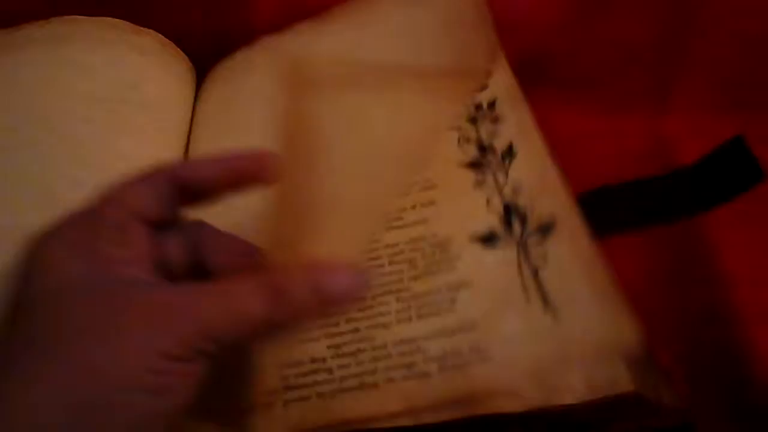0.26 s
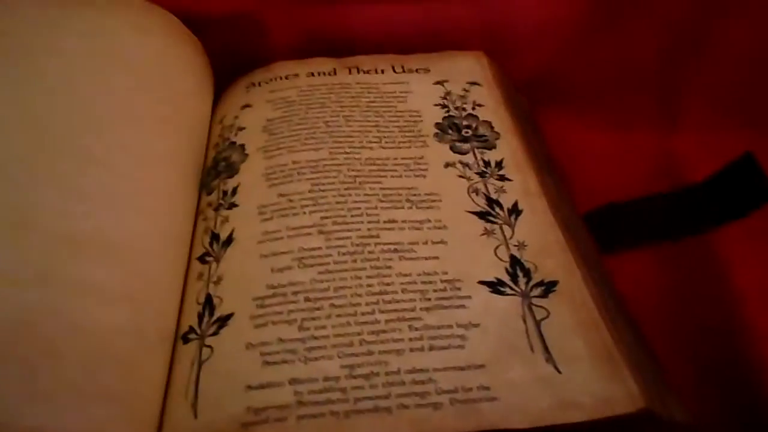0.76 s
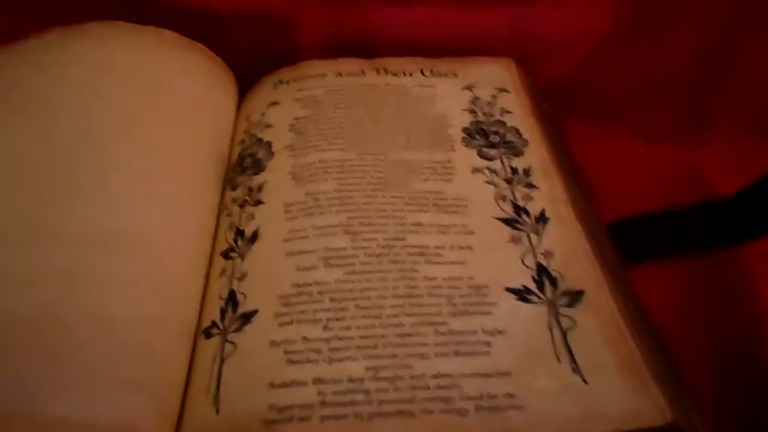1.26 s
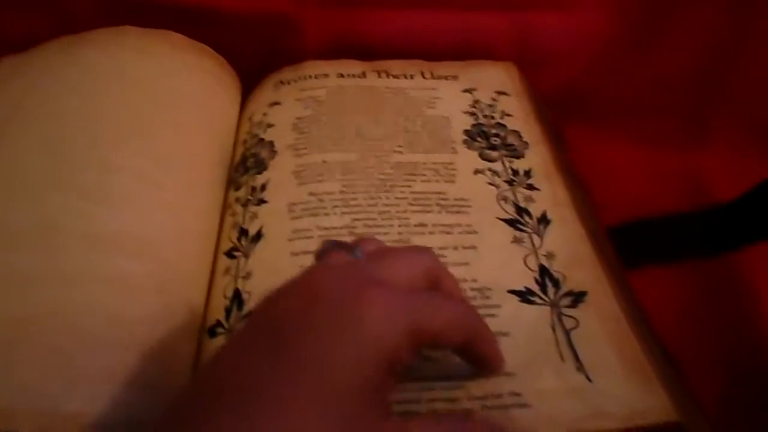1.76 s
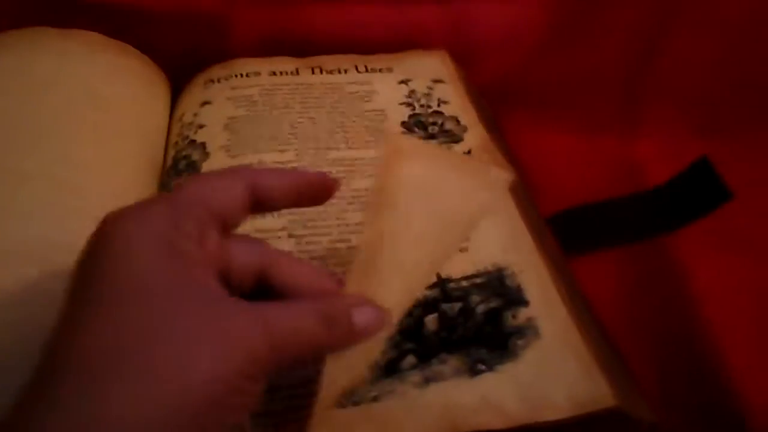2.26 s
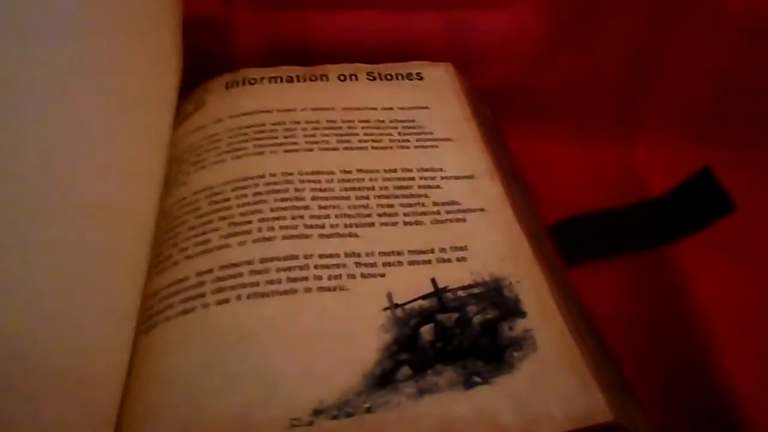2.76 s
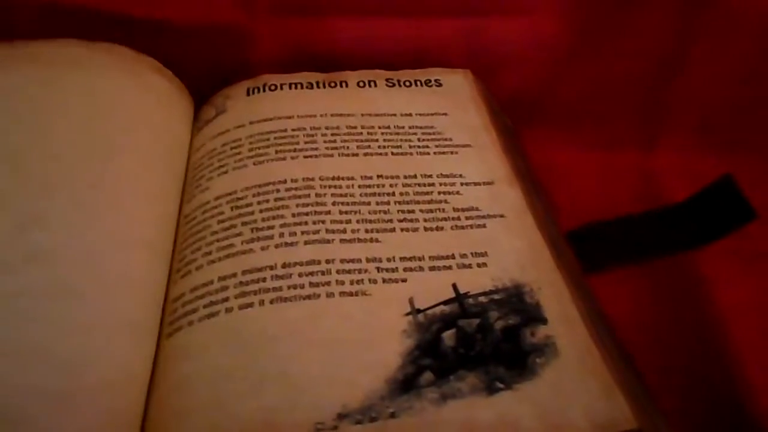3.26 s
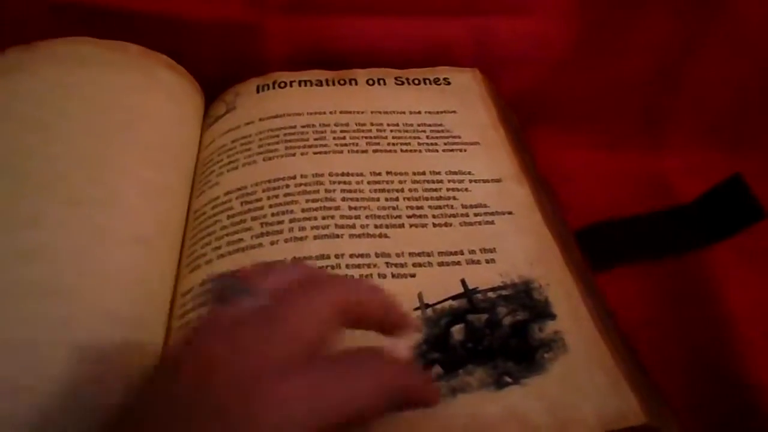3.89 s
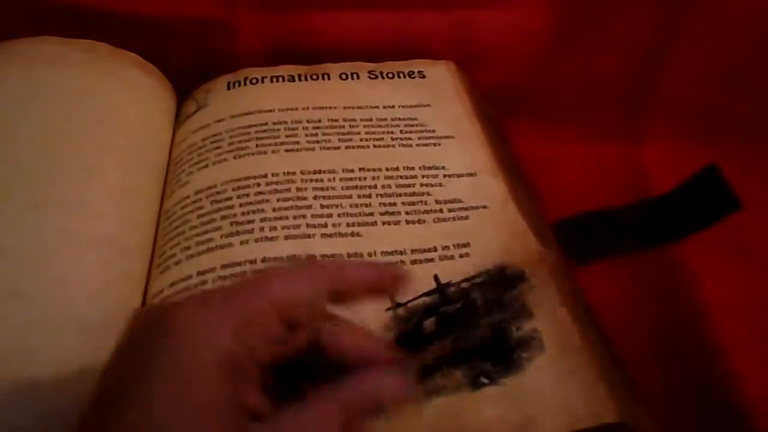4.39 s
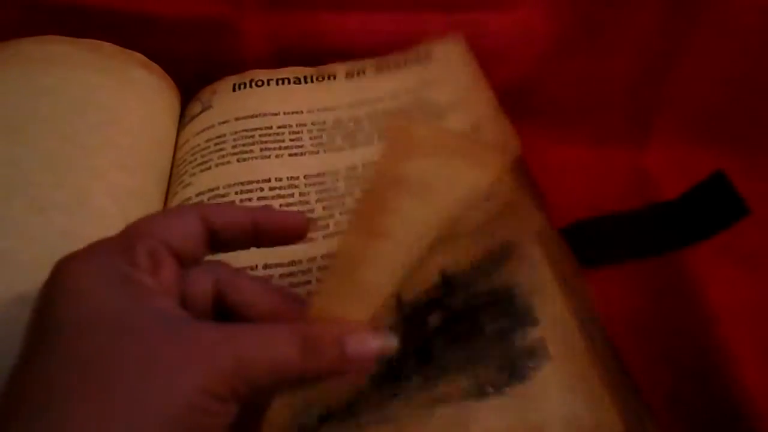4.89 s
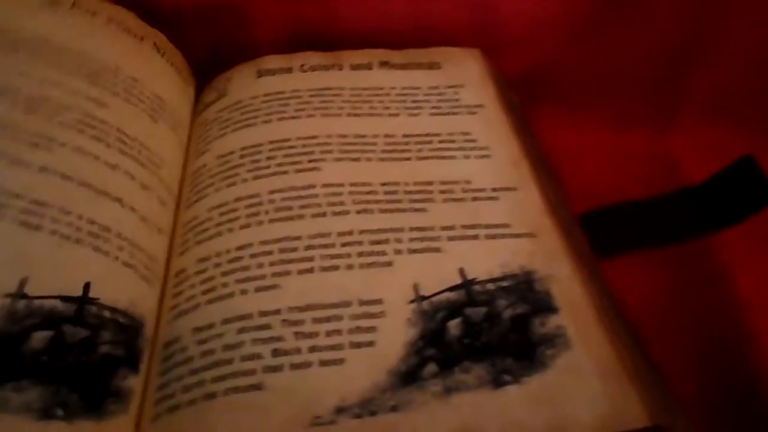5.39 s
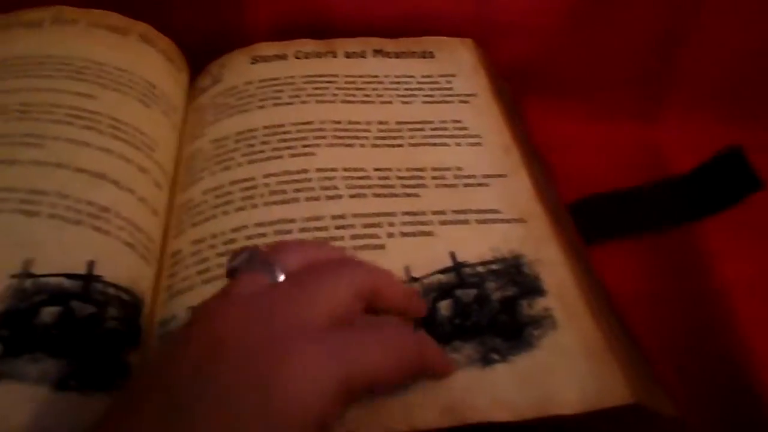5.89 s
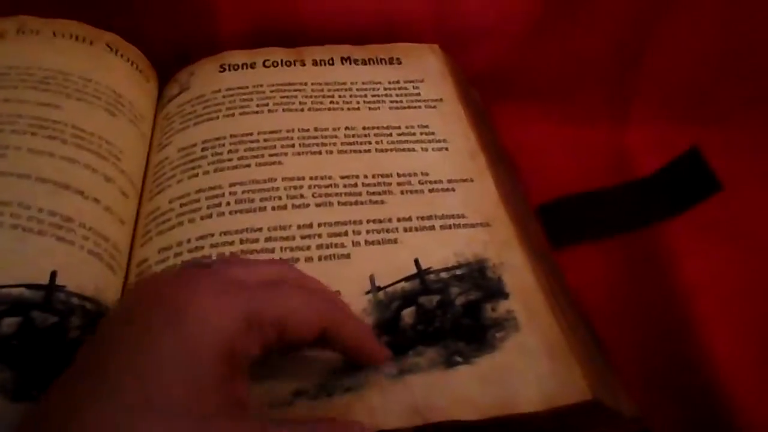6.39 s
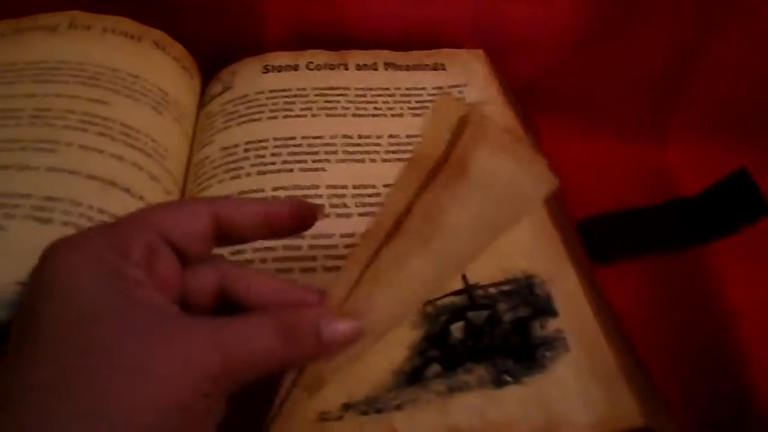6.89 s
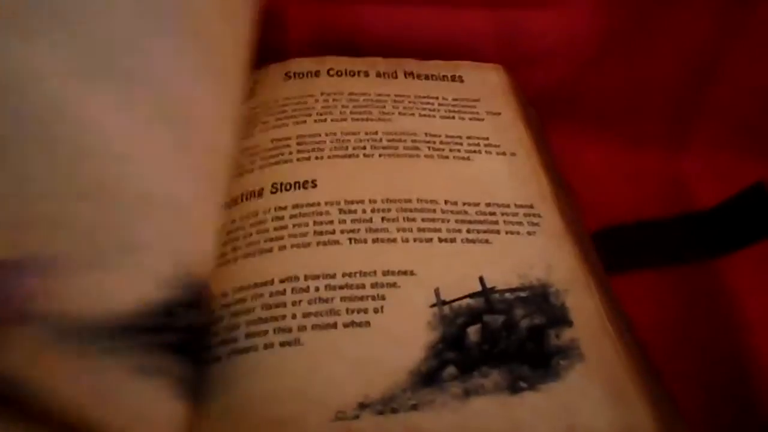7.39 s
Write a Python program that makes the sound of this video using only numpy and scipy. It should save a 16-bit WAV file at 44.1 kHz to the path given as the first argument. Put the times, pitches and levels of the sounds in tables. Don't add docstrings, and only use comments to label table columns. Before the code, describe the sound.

A hand turns stiff pages of a thick book close to a small microphone in a quiet room. A quick rustling turn with pops comes first, then two very loud hard clicks, then three more turns with pauses, each a papery hiss with dull pops and snaps. Low rumble and hiss lie behind, with a faint far hum now and then.

```python
import sys
import numpy as np
from scipy import signal
from scipy.fft import rfft, irfft
from scipy.io import wavfile
from scipy.ndimage import uniform_filter1d

SR = 44100
rng = np.random.default_rng(int(sys.argv[2]) if len(sys.argv) > 2 else 0)


def waveform_to_disk(signal):
    frames = np.transpose(np.atleast_2d(signal))
    scaled = np.clip(frames, -1, 1) * 32767
    samples = np.round(scaled).astype(np.int16)
    wavfile.write(sys.argv[1], SR, samples)


def voltage_ratio(decibels):
    exponent = np.asarray(decibels, float) / 20
    return 10 ** exponent


N = 337365

# (frequency [Hz], width [Hz], level [dB])
BOOM_MODES = [(908, 225, 2.5), (1250, 580, 6), (1980, 610, -2)]


def evened(x):
    return x / np.sqrt(np.mean(x ** 2) + 1e-20)


def add(mix, s, sound):
    part = mix[round(s * SR):][:len(sound)]
    part += sound[:len(part)]


def coloured(x, modes):
    hz = np.fft.rfftfreq(len(x), 1 / SR)
    power = sum(voltage_ratio(db) ** 2 / (1 + (2 * (hz - f) / w) ** 2) ** 2 for f, w, db in modes)
    return evened(irfft(rfft(x) * np.sqrt(power), len(x)))


def resonate(x, hz, width_hz):
    turn = np.exp(2j * np.pi * np.cumsum(hz * np.ones(len(x))) / SR)
    r = np.exp(-np.pi * width_hz / SR)
    return 2 * (turn * signal.lfilter([(1 - r) ** 2], [1, -2 * r, r * r], x / turn)).real


def patchy(hz_span, s_span, size):
    across_hz = uniform_filter1d(rng.standard_normal(size), hz_span, axis=0)
    return evened(uniform_filter1d(across_hz, s_span, axis=1))


def hump(length_s, lean):
    return np.sin(np.pi * np.linspace(0, 1, round(length_s * SR)) ** np.clip(lean, .2, 1.5)) ** 2


def top_cut(x, hz):
    return signal.oaconvolve(x, signal.firwin(511, hz, window=("kaiser", 8), fs=SR), "same")


def paper_noise():
    # (frequency [Hz], width [Hz], level [dB])
    rub_modes = [(3240, 3300, 1.5), (4330, 990, -2), (5300, 3900, -2.5)]
    # (frequency [Hz], width [Hz], level [dB])
    fibre_modes = [(8320, 4200, 7), (10100, 2900, 12.5), (13500, 5000, -24)]
    grain_db, patchy_db, flutter_db = 3, 2.4, 1.2
    grains = rng.standard_normal(N) * voltage_ratio(grain_db * np.minimum(rng.exponential(1, N), 4))
    z = signal.stft(grains, nperseg=256, noverlap=192)[2]
    z = z * voltage_ratio(patchy_db * patchy(hz_span=4, s_span=20, size=z.shape))
    wandering = signal.istft(z, nperseg=256, noverlap=192)[1][:N]
    flutter = voltage_ratio(flutter_db * evened(uniform_filter1d(rng.standard_normal(N), size=300)))
    return [coloured(wandering * flutter, modes) for modes in (BOOM_MODES, rub_modes, fibre_modes)]


def crackle():
    creases_per_s = 250
    creases = (rng.random(N) < creases_per_s / SR) * voltage_ratio(4.1 * np.minimum(rng.exponential(1, N), 2.5))
    creases = creases * rng.choice([-1., 1.], N)
    t = np.arange(600) / SR
    ring = sum(voltage_ratio(db - 13.0 * w * t) * np.sin(2 * np.pi * hz * t) for hz, w, db in BOOM_MODES)
    return evened(signal.oaconvolve(creases, ring)[:N])


def bumps(rows, lean, main, side):
    out = np.zeros(N)
    for s, length_s, db, side_db in rows:
        shape = hump(length_s, lean)
        at = max(round(s * SR) - shape.argmax(), 0)
        part = (main + voltage_ratio(side_db) * side)[at:at + len(shape)]
        add(out, at / SR, voltage_ratio(db) * shape[:len(part)] * part)
    return out


def slides(boom, rub, fibre):
    # (time [s], sliding speed [dB], hand weight on the block [dB])
    page_turns = [
        [(0.0, -58.5, -63), (0.124, -60.5, -59), (0.272, -44.5, -59), (0.452, -48.5, -90), (0.534, -60.5, -63),
         (0.79, -54.5, -48), (1.184, -63.5, -59.5), (1.2, -67, -49), (1.5, -61.5, -60.5)],
        [(1.95, -69, -80), (2.198, -54.5, -61), (2.33, -66, -78), (2.6, -69, -58), (2.738, -64, -57),
         (2.944, -68, -55.5), (3.2, -57, -57.5), (3.51, -75, -68), (3.85, -63, -55)],
        [(4.4, -67, -68), (4.6, -77, -84), (4.724, -56, -57), (4.862, -61, -57.5), (4.946, -45, -51.5),
         (5.26, -63, -90), (5.348, -67, -54), (5.698, -51.5, -55), (5.9, -69, -69)],
        [(6.2, -72, -63), (6.478, -68, -64), (6.65, -70.5, -69), (7.014, -64.5, -64), (7.258, -60, -63),
         (7.378, -49, -61), (7.536, -67, -49), (7.56, -65, -63), (7.65, -63, -42.5)],
    ]
    # (frequency [Hz], width [Hz], level [dB])
    thud_modes = [(145.4, 40, 6), (241, 390, 0), (427, 69, 1.5)]
    # (top time [s], length [s], thud [dB], sheet boom [dB])
    loads = [(0.01, 0.09, -69, -17), (1.42, 0.075, -48, -5.5), (0.665, 0.18, -47, 1),
             (1.21, 0.11, -46, -10), (2.664, 0.08, -53, -7), (2.86, 0.095, -50, -17),
             (2.94, 0.17, -47, -10), (3.55, 0.092, -43, -7), (3.67, 0.21, -49, -6), (3.595, .06, -52, 1),
             (5.16, 0.098, -51.5, -17), (5.36, 0.17, -51, -6), (5.505, 0.064, -46.5, -19),
             (5.608, 0.056, -45, -12), (6.5, .4, -61, -9), (6.92, 0.27, -57.5, -23), (7.08, 0.1, -60, -12),
             (7.31, 0.051, -56, -11), (7.64, 0.041, -56, 3)]
    # (top time [s], length [s], fibre hiss [dB], rub [dB])
    brushes = [(0.272, 0.083, -46, -1.5), (0.39, 0.12, -54, -21), (0.63, 0.068, -64, 0),
               (2.05, .07, -59, -6), (3.07, 0.11, -55, -15), (3.66, 0.067, -71, -4),
               (4.65, 0.019, -67, -10), (4.775, 0.026, -57.5, 0), (5.03, 0.27, -54.5, -19),
               (5.156, .1, -50, -18), (5.606, 0.15, -45, -10), (6.6, 0.07, -62, -26), (7.33, .05, -53, -25)]
    lumpy_db, crackle_db, fibre_db, thud_db = 2, -2.5, 0, -0.5
    t, speed, weight = np.arange(N) / SR, np.zeros(N), np.zeros(N)
    lumps = voltage_ratio(lumpy_db * evened(uniform_filter1d(rng.standard_normal(N), size=250)))
    thud = evened(lumps * coloured(rng.standard_normal(N), thud_modes))
    boom = evened(boom + voltage_ratio(crackle_db) * crackle())
    for rows in page_turns:
        s, speed_db, weight_db = np.transpose(rows)
        inside = np.clip(np.minimum(t - s[0] + .02, s[-1] + .02 - t) / .02, 0, 1)
        speed += inside * voltage_ratio(np.interp(t, s, speed_db) - 5)
        weight += inside * voltage_ratio(np.interp(t, s, weight_db) - 3.5)
    steady = speed * (rub + voltage_ratio(fibre_db) * fibre) + weight * (boom + voltage_ratio(thud_db) * thud)
    return steady + bumps(loads, 0.41, thud, boom) + bumps(brushes, 0.74, fibre, rub)


def drag(rows, rise_s, boom_db, boom, rub, fibre):
    t, out = np.arange(N) / SR, np.zeros(N)
    for start, end, db, bright_db, change_db in rows:
        now = slice(round(start * SR), round((end + .08) * SR))
        u = t[now]
        shape = (1 - np.exp(-abs(u - start) / rise_s)) ** 2 * voltage_ratio(-60 * np.maximum(u - end, 0) / 0.042)
        level = voltage_ratio(db + change_db * np.minimum((u - start) / (end - start), 1))
        friction = np.roll(rub + voltage_ratio(bright_db) * fibre + voltage_ratio(boom_db) * boom, N // 3)[now]
        out[now] += shape * level * friction
    return out


def strokes(paper):
    # (start [s], end [s], friction [dB], brightness [dB], change by the end [dB])
    stroke_rows = [ (0.116, 0.173, -54, 8, -7), (0.548, 0.632, -49, -1.5, -1.5),
                   (0.759, 0.954, -52.5, 5.5, -5.5), (1.038, 1.078, -47, -4, -7),
                   (1.278, 1.324, -49.5, -5.5, -3.5), (2.111, 2.155, -55.5, 3, -11),
                   (2.315, 2.328, -52.5, 8.5, -2), (2.353, 2.373, -46.5, 8, -8.5),
                   (2.758, 2.828, -54.5, -16, 0), (2.855, 2.87, -57, -3, 0), (2.87, 2.908, -52, -3, -2.5),
                   (2.924, 3.111, -53.5, -4, -6.5), (3.361, 3.38, -57.5, -5, -1),
                   (3.655, 3.772, -53, -1.5, 3.5), (4.901, 5.245, -53.5, -1, 1),
                   (5.269, 5.344, -42.5, -3.5, -14), (5.495, 5.658, -55.5, 5, 6),
                   (7.166, 7.254, -40.5, 1, -17), (7.288, 7.326, -44, 3, -9), (7.337, 7.4, -54.5, 11, -17),
                   (7.631, 7.66, -49.5, -0.5, 8), ]
    return drag(stroke_rows, 0.0015, -7, *paper)


def glides(paper):
    # (start [s], end [s], friction [dB], brightness [dB], change by the end [dB])
    glide_rows = [ (0.2, 0.52, -45.5, -1.5, -13), (1.325, 1.41, -47, 3.5, -7), (2.0, 2.07, -52.5, 0, -6),
                  (2.17, 2.265, -62, 6, 5), (3.16, 3.24, -63.5, 7, -5), (4.862, 4.905, -44, 1, 1),
                  (5.42, 5.475, -54.5, 2, -5), (6.76, 6.84, -62, 8, -5), (6.92, 6.965, -59, 6.5, -7),
                  (7.045, 7.112, -42, 0.5, -6.5), (7.425, 7.54, -45, -2, -11), (1.58, 1.628, -65.5, -2, 5),
                  (1.79, 1.89, -64.5, 7, -12), (4.5, 4.63, -67, 10.5, 3.5), ]
    return drag(glide_rows, 0.0094, -6.5, *paper)


def slips(boom, rub, fibre):
    # (time [s], puff peak [dB], brightness [dB], boom [dB], t60 [s])
    jumps = [(0.039, -34, -5, -0.5, 0.022), (1.192, -36, 3, -4, 0.03), (1.248, -33, -4, -5, 0.03),
             (2.4758, -33.5, 7.5, -1.5, 0.044), (2.5646, -33, 7.5, -1, 0.042),
             (2.6614, -31.5, 3, -6, 0.067), (2.698, -36.5, 2.5, -8, 0.049), (3.411, -42.5, 2, 1, 0.062),
             (3.5381, -37, -0.5, 0, 0.08), (3.657, -39, 3, -1, 0.08), (5.102, -23.5, 4, -7, 0.035),
             (5.6469, -27, -17, -3, 0.044), (7.1682, -32, 5, -19, 0.088)]
    t, out = np.arange(6000) / SR, np.zeros(N)
    for s, db, bright_db, boom_db, t60_s in jumps:
        at = round(s * SR)
        puff = (rub + voltage_ratio(bright_db) * fibre + voltage_ratio(boom_db) * boom)[at // 2:][:len(t)]
        fall = voltage_ratio(-60 * t / max(t60_s, .01)) + voltage_ratio(-13 - 60 * t / .2)
        shape = (1 - np.exp(-t / 0.001)) * voltage_ratio(db - 10.0) * fall
        add(out, s, shape[:len(puff)] * puff)
    return out


def swells():
    # (top time [s], length [s], frequency [Hz], level [dB])
    swell_rows = [ (0.263, 0.12, 5500, -47), (0.29, 0.15, 1760, -46), (0.68, 0.045, 1110, -34.5),
                  (0.675, .025, 2150, -42.5), (0.775, 0.031, 1150, -43), (1.326, .016, 1280, -37),
                  (7.612, 0.025, 970, -46.5), (3.698, 0.02, 1260, -33.5), (3.76, 0.024, 1300, -40.5),
                  (4.889, 0.051, 2260, -45), (4.99, 0.12, 1640, -44), (4.981, 0.11, 4250, -45.5),
                  (5.325, 0.05, 1150, -44), (5.439, 0.028, 1130, -41.5), (5.52, 0.024, 1120, -41),
                  (5.695, 0.036, 1070, -42.5), (7.084, .06, 2000, -49.5), (5.144, 0.24, 4100, -57),
                  (7.462, 0.023, 1150, -41), (7.634, 0.033, 1100, -38), (5.611, 0.013, 1150, -37),
                  (0.66, .06, 960, -50.5), (0.46, 0.079, 4700, -53), ]
    out, size = np.zeros(N), (len(swell_rows), SR // 4)
    rubbing = rng.standard_normal(size) * voltage_ratio(3.5 * np.minimum(rng.exponential(1, size), 5))
    for (s, length_s, hz, db), noise in zip(swell_rows, rubbing):
        shape = hump(length_s, .75)
        band = resonate(noise, hz, 523 + 0.17 * hz)[:len(shape)]
        add(out, s - shape.argmax() / SR, voltage_ratio(db - 2.5) * evened(band * shape))
    return out


def bands():
    # (start [s], end [s], first frequency [Hz], last frequency [Hz], level [dB])
    band_rows = [(0.169, 0.36, 2320, 1300, -55), (0.22, 0.33, 5300, 5500, -54),
                 (0.32, 0.39, 4300, 4200, -54), (0.46, 0.525, 4800, 4400, -55),
                 (0.24, 0.35, 7100, 6700, -52), (0.24, 0.33, 8600, 8600, -52),
                 (0.69, 0.745, 1200, 1150, -50), (0.754, 0.8, 1950, 1850, -51.5),
                 (1.04, 1.085, 4200, 4300, -57), (7.11, 7.14, 2700, 2400, -66),
                 (7.06, 7.1, 4500, 4500, -52), (7.168, 7.23, 4700, 4500, -52),
                 (7.35, 7.41, 4500, 4200, -57), (1.425, 1.445, 1300, 1190, -54),
                 (3.559, 3.62, 1490, 1000, -53), (1.45, 1.76, 1640, 1630, -73),
                 (2.93, 3.04, 5500, 5300, -59.5), (4.87, 4.95, 2350, 2050, -51),
                 (4.868, 4.96, 1100, 1200, -55), (4.899, 5.05, 4200, 3900, -53),
                 (4.938, 5.057, 1350, 1750, -53), (5.04, 5.26, 3800, 3000, -57),
                 (5.05, 5.11, 4200, 4100, -57), (7.037, 7.132, 2480, 2000, -59),
                 (7.161, 7.268, 3250, 3500, -57), (7.28, 7.34, 3300, 3450, -57)]
    width_share = 0.11
    out = np.zeros(N)
    noises = rng.standard_normal((len(band_rows), SR // 2))
    for (start, end, first_hz, last_hz, db), noise in zip(band_rows, noises):
        shape = hump(end - start, 0.75) ** .5
        rubbing = (noise * voltage_ratio(4 * abs(noise)))[:len(shape)]
        pitch_hz = np.linspace(first_hz, last_hz, len(shape))
        band = resonate(rubbing, pitch_hz, width_share * first_hz)
        add(out, start, voltage_ratio(db) * evened(band * shape))
    return out


def pops():
    # (time [s], peak [dB], pitch [Hz], low knock [dB])
    buckles = [(0.836, -39, 1110, -12), (1.1927, -27, 950, -15), (1.2479, -29, 970, -12),
               (1.286, -33, 1170, -3), (1.3197, -19, 1380, -13), (1.355, -23, 1660, -15),
               (1.363, -28.5, 1250, 1), (1.402, -40, 594, -9), (1.425, -34, 1200, -15.5),
               (2.477, -34, 950, -20), (2.564, -18.5, 1130, -40), (2.661, -17.5, 1090, -34),
               (2.862, -38, 713, -3), (2.942, -36, 1350, 0), (2.989, -33, 1220, 1), (3.537, -24, 1030, -1),
               (3.657, -23.5, 1130, 0.5), (3.749, -24, 1320, -17), (5.351, -39, 597, -5),
               (0.674, -31, 1390, -11), (5.496, -35, 1070, -8), (5.564, -36, 842, -6),
               (5.592, -23, 1330, -12), (5.649, -36, 880, 7), (7.166, -28, 1360, -22),
               (7.29, -34, 2020, -21), (7.31, -28.5, 1350, -19), (7.454, -22.5, 1260, -30),
               (7.49, -28, 1260, -12), (7.574, -36, 1300, -14)]
    cycles_to_60_db = 7.8
    t, out = np.arange(2000) / SR, np.zeros(N)
    for (s, db, hz, knock_db), late in zip(buckles, rng.random(len(buckles))):
        ring = voltage_ratio(db - 60 * t * hz / cycles_to_60_db) * np.sin(2 * np.pi * hz * t)
        ring = ring * (1 - np.exp(-t / 0.00038)) * 1.44
        push = t / 0.00044 * np.exp(1 - t / .00022)
        push = push - 0.11 * t / 0.0019 * np.exp(1 - t / 0.0035)
        add(out, s + 0.001016, ring + voltage_ratio(db + knock_db + 2.5) * push)
        add(out, s + 0.00252 + 0.00155 * late, -.2 * ring)
    return out


def snaps():
    # (time [s], peak [dB], frequency [Hz], t60 [s])
    folds = [(0.0405, -36.5, 2800, .012), (0.077, -45, 2500, .012), (0.411, -24, 6350, 0.011),
             (1.2, -34, 1000, .015), (1.217, -38, 447, .03), (1.322, -31, 2600, .008),
             (1.327, -33.5, 444, .03), (1.356, -35, 2700, .008), (1.364, -38.5, 497, .025),
             (1.436, -42, 1200, .02), (2.855, -45, 3000, .01), (2.953, -38, 1500, .02),
             (2.975, -37.5, 950, .015), (3.023, -39, 1130, .015), (3.055, -41, 1400, .025),
             (4.881, -37, 2200, .015), (5.103, -25, 4500, .012), (5.309, -38, 1000, 0.017),
             (5.356, -42, 1800, .012), (5.46, -36, 1300, .02), (5.517, -39, 1800, .012),
             (5.572, -40, 450, .025), (5.593, -41, 2700, .01), (5.608, -32, 2200, .012),
             (5.609, -34, 400, .03), (5.637, -38, 2500, .012), (5.66, -37, 1100, .015),
             (5.68, -40, 1000, .015), (5.693, -44, 3000, .008), (0.836, -40, 900, .015),
             (3.682, -36, 1400, .02), (3.73, -38, 1200, .02), (3.75, -37, 2200, .01),
             (5.41, -46, 3500, .01), (7.167, -32, 5000, .012), (7.29, -37, 4800, .012),
             (7.312, -36, 2300, .01), (7.408, -41, 2400, .012), (7.513, -40, 1150, 0.022),
             (7.535, -41, 1200, .02)]
    width_share = 0.42
    t, out = np.arange(1500) / SR, np.zeros(N)
    for (s, db, hz, t60_s), noise in zip(folds, rng.standard_normal((len(folds), len(t)))):
        burst = resonate(noise * voltage_ratio(-60 * t / max(t60_s, .002)), hz, width_share * hz)
        add(out, s, voltage_ratio(db) * burst / abs(burst).max())
    return out


def flicks():
    # (time [s], peak [dB], width [s])
    air_flicks = [(1.1931, -19, .0002), (1.2486, -20, .0002), (1.2871, -29, .00025), (1.3632, -31, .00025),
                  (2.871, -40, .0003), (2.943, -36, .0002), (3.5392, -26, .00025), (3.6572, -30, .0002),
                  (5.355, -38, .0004), (5.39, -40, .0005), (5.436, -38, .0004), (5.6095, -31, .0003)]
    t, out = np.arange(-300, 900) / SR, np.zeros(N)
    for s, db, width_s in air_flicks:
        spike = np.exp(np.where(t < 0, 2.0 * t, -t) / width_s)
        add(out, s + t[0], voltage_ratio(db) * (spike - uniform_filter1d(spike, size=400)))
    return out


def clicks():
    plastic_clicks = [
        (1.6294, 0, -34, [(2372, -19.5, 0.012), (3939, -16, 0.012), (4054, -9, .0066), (4520, -6, 0.006), (7342, -15, 0.0045), (9583, -12, .0016), (5500, -11, 0.0051), (12000, -12, .0014), (8400, -25, .005), (5940, -30, .0075), (1936, -31, .009), (6425, -26, 0.0096), (15300, -22, .002), (3398, -24, .007)]),
        (1.7522, 1, -18, [(2300, -18.5, 0.017), (3939, -17, 0.018), (3460, -11.5, 0.003), (4550, -3.5, 0.0054), (4000, -9, 0.006), (5253, -2, 0.0021), (8550, -5, 0.0037), (6294, -16, 0.0048), (2730, -33, .008), (6972, -9, 0.0016), (9786, -12, 0.0034), (14760, -11, 0.0011), (11709, -23, .004), (2020, -27, .006)]),
    ]
    blow_s = .00006
    t, out = np.arange(1500) / SR, np.zeros(N)
    thin = signal.butter(2, 1300, "high", fs=SR)
    for s, db, blow_db, modes in plastic_clicks:
        ring = sum((-1) ** k * voltage_ratio(mode_db - 60 * t / t60_s) * np.sin(2 * np.pi * hz * t)
                   for k, (hz, mode_db, t60_s) in enumerate(modes))
        ring = signal.lfilter(*thin, ring * (1 - np.exp(-t / .00008)))
        blow = voltage_ratio(blow_db) * t / blow_s * np.exp(1 - t / blow_s)
        add(out, s, voltage_ratio(db) * (ring - blow))
    return out


def ticks():
    # (time [s], peak [dB])
    tick_rows = [(0.0398, -34), (0.41, -21), (1.1495, -35), (1.1796, -31.5), (1.192, -40), (1.2478, -39),
                 (1.7897, -21.5), (1.8407, -34.5), (1.9792, -35), (2.662, -35), (2.6824, -34), (3.54, -27),
                 (5.4076, -44), (6.83, -40), (6.8444, -43), (7.3114, -25), (7.5735, -27)]
    t, out = np.arange(1500) / SR, np.zeros(N)
    bright = signal.butter(2, [2000, 9000], "band", fs=SR)
    for (s, db), noise in zip(tick_rows, rng.standard_normal((len(tick_rows), len(t)))):
        add(out, s, voltage_ratio(db - 6.0 - 60 * t / 0.0063) * signal.lfilter(*bright, noise))
    return out


def hum():
    # (start [s], length [s], pitch [Hz], level [dB])
    spells = [
        (0.819, 0.3, 207.3, -51.5),
        (3.0, 0.25, 201.4, -51.5),
        (5.201, 0.225, 202.6, -52.5),
        (7.38, 0.28, 206.7, -54.5),
    ]
    waver_hz, throb_db, sag_db = 0.72, 0.5, -2.5
    out = np.zeros(N)
    for s, length_s, hz, db in spells:
        t = np.arange(0, length_s, 1 / SR)
        pitch_hz = hz + waver_hz * np.sin(2 * np.pi * 5.6 * t)
        tone = np.sqrt(2) * np.sin(2 * np.pi * np.cumsum(pitch_hz) / SR)
        level_db = db + sag_db * t / length_s + throb_db * np.sin(2 * np.pi * 9.4 * t)
        add(out, s, voltage_ratio(level_db) * tone * signal.windows.tukey(len(t), .25))
    return out


def room():
    # (frequency [Hz], density [dB per Hz])
    air_spectrum = [(12, -13), (20, -15.5), (48, -0.5), (69, -3), (87, -20), (115, -22), (175, -18),
                    (208, -22.5), (430, -28.5), (475, -30.5), (785, -34.5), (1330, -33.5), (1670, -38.5),
                    (1790, -38.5), (2900, -45), (8360, -47), (10500, -45.5), (15100, -53), (16900, -86)]
    # (frequency [Hz], width [Hz], level [dB])
    house_modes = [(33.9, 8.4, -42.5), (56.4, 11, -48.5), (99.3, 20, -55), (118.3, 9.8, -58),
                   (1640, 9, -75), (733.5, 10, -73.5)]
    air_db = -39.5 - 4.5
    hz, (f, db) = np.fft.rfftfreq(4096, 1 / SR), np.transpose(air_spectrum[:-1])
    z = signal.stft(rng.standard_normal(N), nperseg=4096, noverlap=3072)[2]
    curve_db = np.interp(np.log(hz + 1), np.log(f + 1), db)[:, None]
    z *= voltage_ratio(curve_db + .9 * patchy(hz_span=30, s_span=6, size=z.shape))
    air = voltage_ratio(air_db) * evened(signal.istft(z, nperseg=4096, noverlap=3072)[1][:N])
    return air + sum(voltage_ratio(db) * coloured(rng.standard_normal(N), [(f, w, 0)]) for f, w, db in house_modes)


def scene():
    edge_hz = 15950
    paper = paper_noise()
    soft = slides(*paper) + strokes(paper) + glides(paper) + slips(*paper) + swells() + bands()
    soft = soft + pops() + snaps() + flicks() + hum() + room()
    hard = clicks() + ticks()
    return (top_cut(soft, edge_hz) + top_cut(hard, edge_hz + 800))[None]


def band_limit(x):
    return signal.sosfilt(signal.butter(12, 17070, fs=SR, output="sos"), x)


def record(dry):
    recovery_db_per_s, threshold_db, overload = 12.8, -40, .72
    power_db = 10 * np.log10(abs(uniform_filter1d(dry[0] ** 2, size=200)) + 1e-12)
    rise_db = np.arange(N) * recovery_db_per_s / SR
    held_db = np.maximum.accumulate(power_db + rise_db) - rise_db
    over_db = np.maximum(held_db - threshold_db, 0)
    late_db = np.concatenate([np.zeros(400), uniform_filter1d(over_db, size=400)])[:N]
    levelled = dry / voltage_ratio(0.26 * late_db)
    return band_limit(overload * np.tanh(levelled / overload))


dry = scene()
out = record(dry)
waveform_to_disk(out)
```